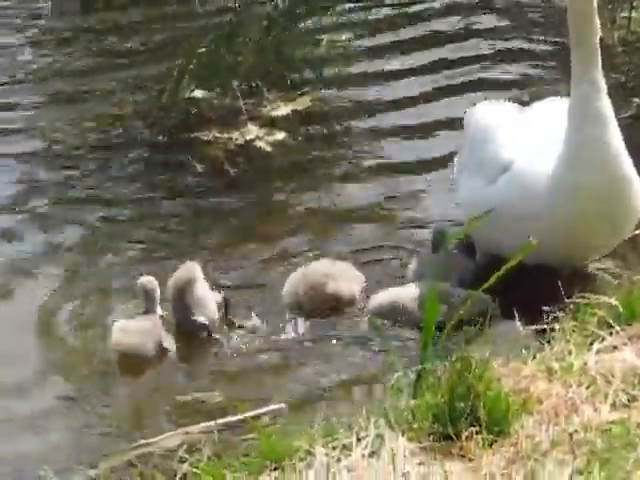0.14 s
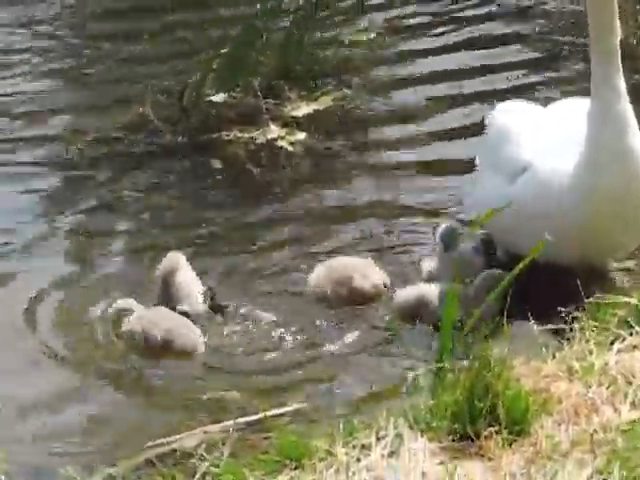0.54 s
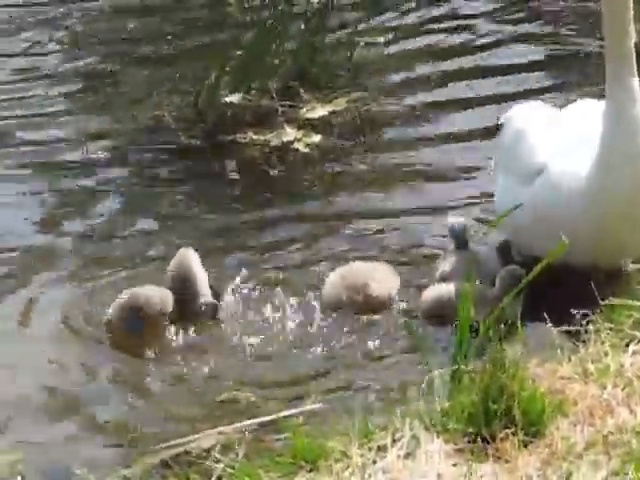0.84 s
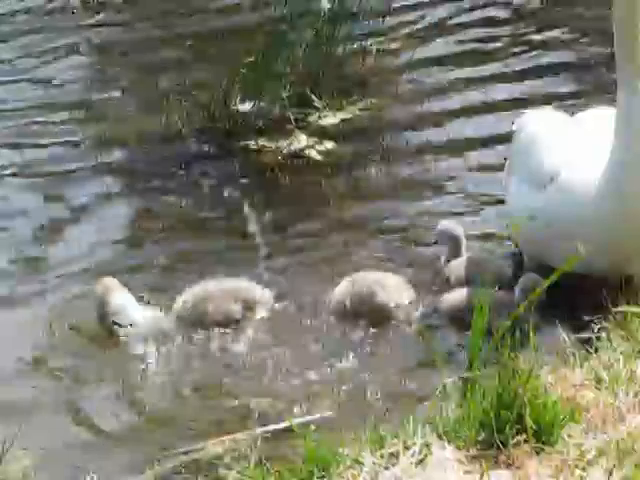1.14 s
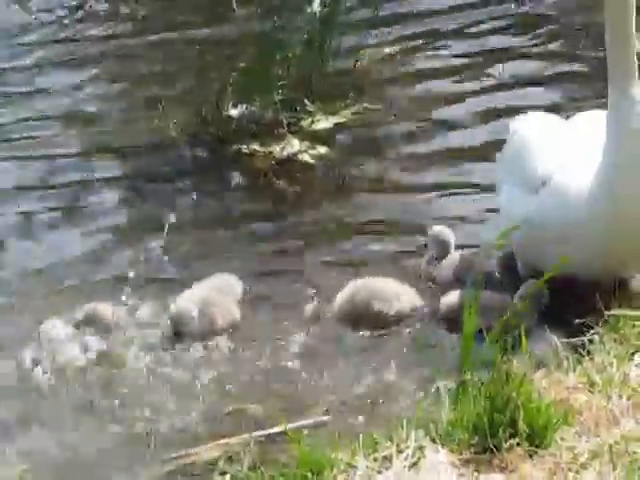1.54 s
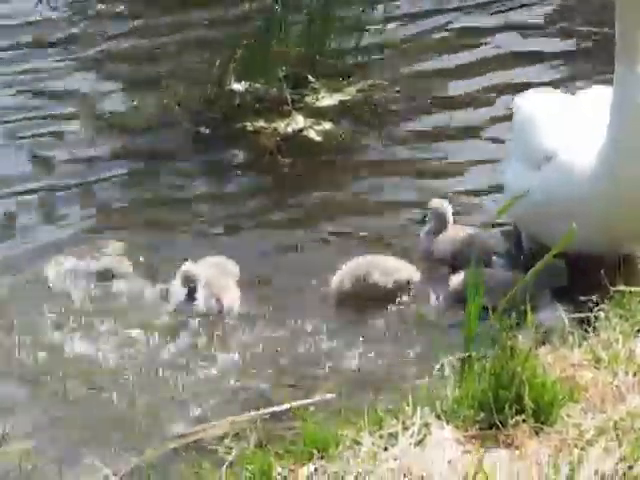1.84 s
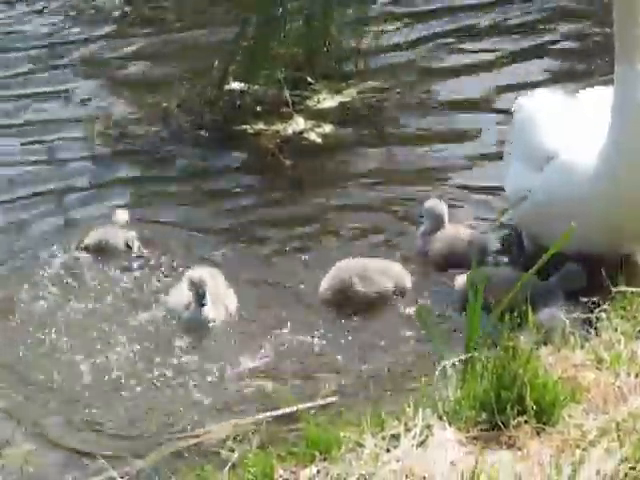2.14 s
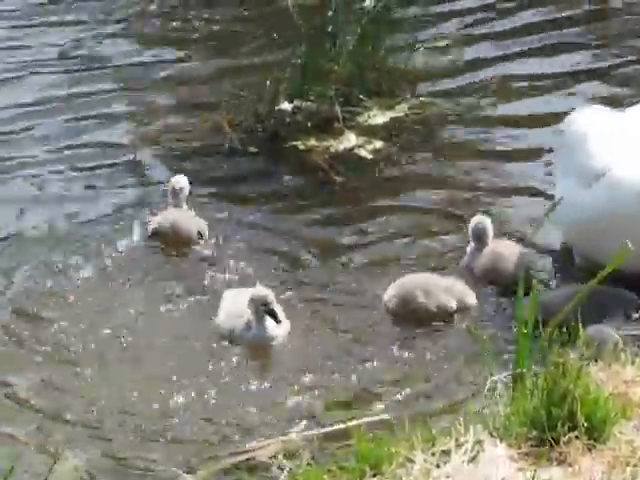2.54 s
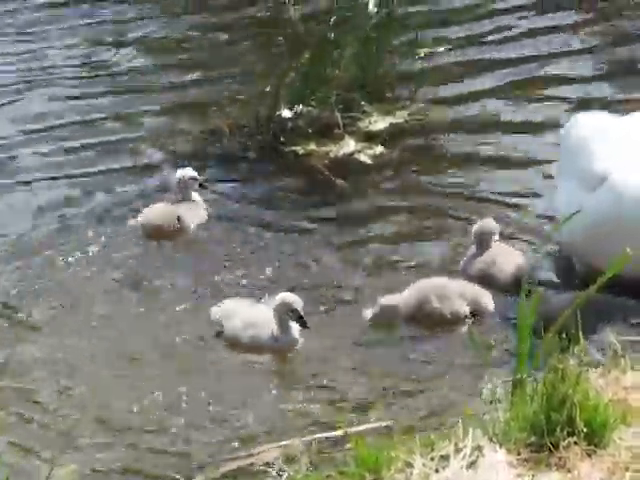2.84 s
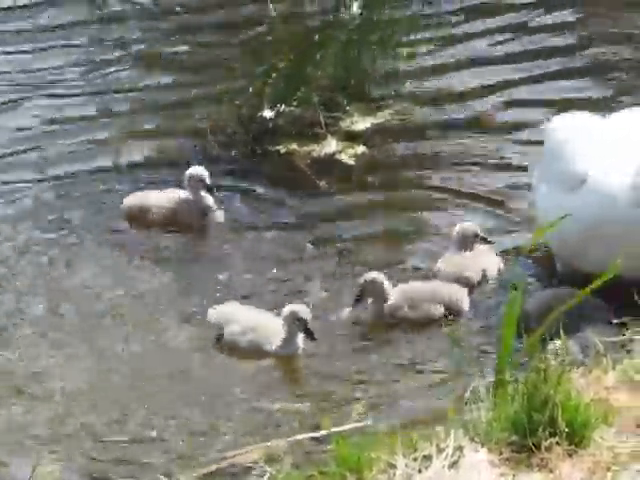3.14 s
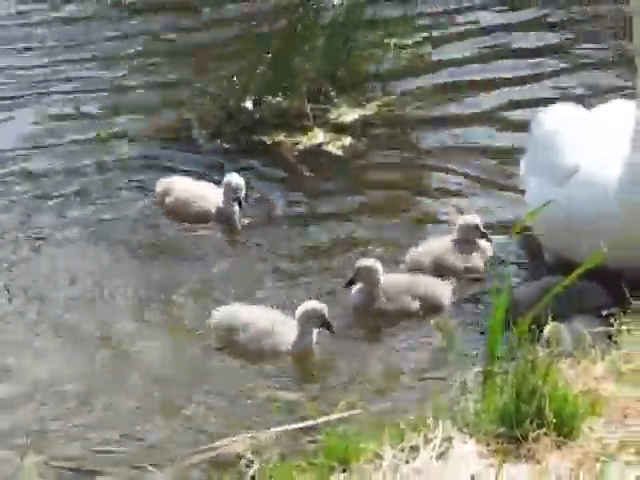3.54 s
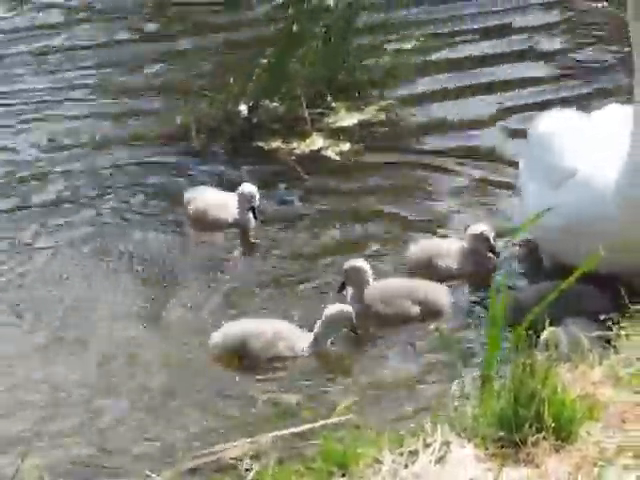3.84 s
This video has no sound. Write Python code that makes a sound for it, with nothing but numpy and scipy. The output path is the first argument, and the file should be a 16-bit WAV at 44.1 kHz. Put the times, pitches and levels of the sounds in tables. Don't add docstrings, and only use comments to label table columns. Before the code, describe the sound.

Lumpy wind rumble and thumps buffet the stereo microphones at a pond, with two short honks at the start, then cygnets splashing close by with plops and spray, fading as the wind grows.

```python
import sys
import numpy as np
from scipy import signal
from scipy.io import wavfile
from scipy.ndimage import uniform_filter1d

SR = 44100
rng = np.random.default_rng(int(sys.argv[2]) if len(sys.argv) > 2 else 0)


def waveform_to_disk(signal):
    frames = np.transpose(np.atleast_2d(signal))
    scaled = np.clip(frames, -1, 1) * 32767
    samples = np.round(scaled).astype(np.int16)
    wavfile.write(sys.argv[1], SR, samples)


def level_to_linear(level):
    exponent = np.asarray(level, float) / 20
    return 10 ** exponent


N = 176400


def read(points, hz):
    f, value = np.transpose(points)
    return np.interp(np.log(hz + 1), np.log(f + 1), value)


def curve(rows, t):
    rows = np.transpose(rows)
    return [np.interp(t, rows[0], column) for column in rows[1:]]


def evened(x):
    return x / np.sqrt(np.mean(x ** 2) + 1e-20)


def add(mix, s, sound):
    part = mix[..., max(round(s * SR), 0):][..., :sound.shape[-1]]
    part += sound[..., :part.shape[-1]]


def panned(x, pan_db):
    gain = level_to_linear(np.array([.5, -.5])[:, None] * pan_db)
    return x * gain / gain.mean(0)


def resonate(x, hz, width):
    turn = np.exp(2j * np.pi * hz * np.arange(len(x)) / SR)
    r = np.exp(-np.pi * width / SR)
    return 2 * (turn * signal.lfilter([1 - r], [1, -r], x / turn)).real


def hiss(field_db, same, size):
    a, b, c, d = rng.standard_normal(field_db.shape[-1:] + (size // 2 + 1, 4)).T
    left = a + 1j * b
    right = same * left + np.sqrt(1 - same ** 2) * (c + 1j * d)
    z = np.array([left, right]) * level_to_linear(field_db)
    return signal.istft(z, nperseg=size, noverlap=size * 3 // 4)[1][:, :N]


def bubble(hz, cycles, rise):
    u = np.arange(0, 3 * cycles, hz / SR)
    swell = (2 * u / cycles * np.exp(1 - 2 * u / cycles)) ** 2
    return swell * np.sin(2 * np.pi * u * (1 + rise * u / cycles))


# (time [s], far road level [dB], open air level [dB])
BACKGROUND = [(0, -44, -50), (1.5, -40, -48), (1.9, -44, -50.5), (2.45, -52.5, -54.5), (2.9, -54.5, -55),
              (4, -56, -58)]
# (frequency [Hz], level [dB per Hz])
ROAD_SPECTRUM = [(150, -29), (400, 2.5), (600, -6), (850, 6.5), (1100, -3), (1500, -11), (2500, -13.5),
                 (4000, -24)]
# (frequency [Hz], level [dB per Hz])
AIR_SPECTRUM = [(900, -8.5), (1450, -9.5), (4000, -12), (7500, -18), (15600, -36)]
# (frequency [Hz], likeness [0-1])
LIKENESS = [(240, 1), (950, 0.82), (3770, 0.08), (15000, .44)]


def ambience():
    size, whine_hz, whine_db = 512, 7882, -69
    hz, t = np.fft.rfftfreq(size, 1 / SR), np.arange(N) / SR
    frames = N * 4 // size + 5
    same = np.clip(read(LIKENESS, hz), 0, 1)[:, None]
    patches = uniform_filter1d(rng.standard_normal((frames, len(hz))), size=24, axis=0)
    patches = evened(uniform_filter1d(patches, size=6, axis=1)).T
    road_db, air_db = curve(BACKGROUND, t)
    road_shape = read(ROAD_SPECTRUM + [(9000, -78)], hz)[:, None]
    air_shape = read([(200, -6)] + AIR_SPECTRUM, hz)[:, None]
    road = evened(hiss(road_shape + 1.2 * patches, same, size))
    air = evened(hiss(air_shape + patches, same, size))
    whine = np.sin(2 * np.pi * np.cumsum(whine_hz + 35 * np.sin(2 * np.pi * 30 * t)) / SR)
    whine = level_to_linear(whine_db + (air_db + 55) / 2) * whine
    return level_to_linear(road_db + 2.5) * road + level_to_linear(air_db + 4.5) * air + whine


# (time [s], left level [dB], right level [dB])
WIND_LEVEL = [(0, -29.5, -20.5), (.7, -29, -25), (1.2, -31, -30.5), (1.6, -35.5, -30.5), (1.75, -34, -20),
              (2.1, -24.5, -16.5), (2.3, -32.5, -17.5), (2.8, -22, -14.5), (3.2, -21, -14.5),
              (3.45, -31.5, -18), (4, -18, -16)]
# (time [s], level [dB])
EDDIES = [
    [(.05, -19.5), (.46, -19), (.6, -19.5), (.85, -16.5), (1.05, -22.5), (1.26, -32), (1.7, -16.5),
     (1.785, -11.5), (1.83, -10), (1.872, -12), (2.033, -17), (2.101, -9), (2.12, -10.5), (2.159, -14.5),
     (2.375, -15.5), (2.458, -11.5), (2.74, -13.5), (2.8, -9), (2.935, -19), (3.095, -15.5), (3.285, -19),
     (3.552, -16), (3.654, -20), (3.951, -23.5)],
    [(.07, -11), (.413, -16), (.473, -10), (.63, -12), (.74, -15.5), (.86, -18.5), (1.07, -31.5),
     (1.63, -24), (1.714, -16), (1.844, -14), (1.906, -14.5), (2.103, -9), (2.165, -9), (2.359, -10),
     (2.405, -8), (2.46, -7), (2.66, -10.5), (2.754, -8), (2.8, -10.5), (2.959, -13), (3.109, -8),
     (3.21, -38), (3.538, -8), (3.582, -11), (3.664, -11), (3.793, -10)],
]
# (frequency [Hz], level [dB per Hz])
RUMBLE_SPECTRUM = [(15, 1.5), (70, 5), (140, 0), (210, -15), (330, -21.5), (800, -43), (1500, -52)]


def wind():
    size, brighten, lump_db, thump_s, steady = 512, .25, 2.5, .013, .6
    t = np.arange(N * 4 // size + 5) * size / 4 / SR
    hz = np.fft.rfftfreq(size, 1 / SR)
    lumps = evened(uniform_filter1d(rng.standard_normal((len(t), 2)), size=10, axis=0).T)
    power = level_to_linear(2 * (np.array(curve(WIND_LEVEL, t)) + lump_db * lumps))
    power = power + [sum(level_to_linear(2 * db) * np.exp(-((t - s) / thump_s) ** 2) for s, db in port)
                     for port in EDDIES]
    port_db = 10 * np.log10(power)
    stretch = level_to_linear(brighten * (port_db + 13.5))[:, None]
    shape = read(RUMBLE_SPECTRUM + [(6000, -120)], hz[:, None] / stretch)
    shape = shape - 10 * np.log10(level_to_linear(2 * shape).sum(1, keepdims=True))
    x = hiss(shape, 0.095, size)
    swing = uniform_filter1d(uniform_filter1d(x ** 2, size=700), size=700)
    swing = np.sqrt(abs(swing) + 1e-12)
    gain = [np.interp(np.arange(N) / SR, t, level_to_linear(db)) for db in port_db]
    push = np.array(gain) * evened(x / swing ** steady)
    return push * (0.97 + 0.48 * push ** 2)


# (time [s], peak level [dB], left-right [dB])
EDDY_EDGES = [(1.736, -37, -2), (1.809, -28, 9), (1.859, -34, -4), (1.981, -36, -2), (2.168, -32, -5),
              (2.312, -38, -3), (2.399, -29, -9), (2.442, -40, -1.0), (2.462, -29, -8.5), (2.75, -32, 4),
              (3.068, -34, -10), (3.112, -27, -11.5), (3.132, -33, -1), (3.434, -37, -4), (3.534, -31, -1),
              (3.682, -30.5, -16), (3.812, -29, -14.5)]
# (time [s], peak level [dB], pitch [Hz], left-right [dB])
FAST_EDDIES = [
    (1.803, -14, 267, 18),
    (1.893, -15.5, 260, -5),
    (2.355, -22, 198, -2),
    (3.62, -23, 295, -7),
]


def cracks():
    crack_db, crack_hz, crack_cycles, whirl_cycles = 7.5, 431, 1.42, 3.4
    out = np.zeros((2, N))
    for (s, db, pan_db), (a, b) in zip(EDDY_EDGES, rng.random((len(EDDY_EDGES), 2))):
        pop = bubble(crack_hz * (0.89 + 0.29 * a), crack_cycles, -0.11)
        pop = pop * np.sign(b - .5)
        add(out, s, panned(level_to_linear(db + crack_db) * pop, 2 * pan_db))
    for s, db, hz, pan_db in FAST_EDDIES:
        add(out, s, panned(level_to_linear(db) * bubble(hz, whirl_cycles, 0), 2 * pan_db))
    return out


def bank(x):
    t60_s, level_db = .04, -12
    t = np.arange(8000) / SR
    scattered = rng.random((8000, 2)).T < .05
    taps = rng.standard_normal((8000, 2)).T * scattered * level_to_linear(-60 * t / t60_s) * (t > .003)
    return level_to_linear(level_db) * signal.fftconvolve(x[None], taps / np.linalg.norm(taps[0]), axes=1)[:, :N]


# (start [s], length [s], top pitch [Hz], level [dB])
CYGNET_PEEPS = [
    (1.95, .07, 2300, -53),
    (2.83, .1, 2500, -53),
    (3.262, .066, 2190, -52.5),
]


def peep(start, length, top_hz, level_db):
    arch, skew = .25, 1.1
    u = np.arange(0, 1, 1 / (length * SR))
    hz = top_hz * (1 - arch + arch * np.sin(.93 * np.pi * u ** skew))
    return start, level_to_linear(level_db) * np.sin(np.pi * u) ** .3 * np.sin(2 * np.pi * np.cumsum(hz) / SR)


# (time [s], pitch [Hz], effort level [dB], roughness [0-1])
HONK_CALLS = [
    [(.195, 505, -48, .1), (.202, 497, -30, .2), (.222, 482, -28, .25), (.242, 452, -30, .4),
     (.254, 400, -31, .7), (.268, 345, -32, .85), (.278, 330, -44, .9)],
    [(.341, 480, -50, .6), (.344, 480, -26, .6), (.349, 470, -48, .7), (.358, 500, -34, .7),
     (.388, 515, -28, .55), (.408, 545, -29, .42), (.434, 568, -28.5, .4), (.45, 575, -33, .25),
     (.472, 578, -42, .2)],
]
# (frequency [Hz], width [Hz], level [dB], left-right [dB])
THROAT_RESONANCES = [(596, 145, 0, -3.5), (1020, 380, 0, 6.5), (1650, 250, -5, -19), (2005, 275, 1.5, -19),
                     (2490, 160, -7, 5), (3970, 900, -10.5, -7)]


def honk(rows):
    flutter_hz, flutter = 95, .5
    t = np.arange(rows[0][0], rows[-1][0], 1 / SR)
    hz, effort_db, rough = curve(rows, t)
    rough = np.clip(rough, 0, 1)
    wobble = evened(uniform_filter1d(rng.standard_normal(len(t)), size=150))
    turns = np.cumsum(hz * (1 + 0.073 * rough * wobble)) / SR
    folds = sum(np.cos(2 * np.pi * k * turns) for k in range(1, 7))
    folds = folds * (1 + 2 * flutter * rough * np.sin(2 * np.pi * flutter_hz * t + 1.7 * wobble))
    puffs = (0.11 + np.exp(-(turns % 1) / 0.18)) * rng.standard_normal(len(t))
    drive = (1 - rough) * evened(folds) + rough * evened(puffs)
    throat = 0
    for f, width, db, pan_db in THROAT_RESONANCES:
        ring = resonate(resonate(drive, f, width), f, width)
        throat = throat + panned(level_to_linear(db) * ring, pan_db)
    return t[0], level_to_linear(effort_db) * evened(throat)


# (time [s], spray level [dB])
PADDLING = [
    (.6, -63.5),
    (1.0, -51.5),
    (1.3, -50),
    (1.55, -43.5),
    (1.85, -49.5),
    (2.15, -65),
    (2.5, -64.5),
]


def spray():
    drops_per_s, spread_db, low_hz, high_hz, tilt_db, rise = 2200, 3.6, 1500, 14000, -6.5, .055
    effort_db, = curve(PADDLING, np.arange(N) / SR)
    drop = rng.random(N) < drops_per_s / SR
    size = level_to_linear(spread_db * np.minimum(rng.exponential(1, N), 4)) * drop
    size = size + .3 * rng.standard_normal(N)
    kind, out = rng.integers(0, 32, N), np.zeros((2, N))
    for k, (a, b) in enumerate(rng.random((32, 2))):
        hz = low_hz * (high_hz / low_hz) ** (k / 32 + a / 32)
        grain = level_to_linear(tilt_db * np.log2(hz / 2000)) * bubble(hz, 0.42 + 4 * b, rise)
        out[k % 2] += signal.oaconvolve(size * (kind == k), grain)[:N]
    clumps = evened(uniform_filter1d(rng.standard_normal(N), size=900))
    return level_to_linear(effort_db + 4.6 * clumps) * evened(out + 0.29 * out[::-1])


# (time [s], peak level [dB], pitch [Hz])
BUBBLE_PLOPS = [(0.6853, -39, 2390), (0.719, -42, 2380), (0.8621, -32.5, 3240), (0.9192, -35.5, 3760),
                (1.049, -36, 2650), (1.1176, -32, 2420), (1.1208, -24.5, 1950), (.7904, -47, 2860),
                (1.041, -45, 1890), (1.0907, -45, 2870), (1.1508, -45, 2900), (1.143, -45, 1650),
                (1.396, -45, 3420), (1.241, -41.5, 4700), (1.689, -41, 2300), (1.848, -40, 2900),
                (1.629, -45, 2780), (1.651, -44, 2070), (1.748, -48, 1930), (1.784, -42, 3000),
                (1.84, -42, 1940), (1.976, -46, 2150), (2.064, -45.5, 1980), (1.2054, -40.5, 3750),
                (1.251, -38, 2600), (1.2913, -39, 1670), (1.3124, -37.5, 2370), (1.3362, -36.5, 2500),
                (1.3803, -38, 4830), (1.4224, -49, 1620), (1.516, -47, 1630), (1.5452, -33.5, 2880),
                (1.672, -33.5, 2570), (1.6838, -40, 1860), (1.862, -40, 1740), (1.8857, -36.5, 3170),
                (1.944, -44, 2690), (2.1134, -40.5, 2520)]
# (time [s], peak level [dB], centre [Hz])
WATER_SLAPS = [(.244, -34.5, 6700), (.721, -42, 7960), (.745, -40, 10500), (0.858, -31.5, 6200),
               (.923, -27, 6000), (0.927, -44, 8950), (1.11, -47, 10000), (1.201, -36, 6600),
               (1.347, -36, 6760), (1.417, -39.5, 12600), (1.479, -41, 10000), (1.506, -46, 11000),
               (1.528, -32, 4940), (1.572, -38.5, 7900), (1.8, -45, 12500), (1.853, -39.5, 9100),
               (1.677, -30.5, 3460), (2.298, -48, 10500), (2.394, -45, 9000), (2.751, -47, 8100)]
# (time [s], peak level [dB], centre [Hz])
DROP_TICKS = [(1.226, -39, 11000), (1.232, -40, 10500), (1.252, -31, 3800), (1.41, -37.5, 3300),
              (1.673, -31, 4000), (1.358, -36, 6000), (1.371, -46, 13000), (1.446, -36, 6500),
              (1.486, -37, 10500), (1.499, -36, 9500), (1.523, -24, 5000), (1.532, -33, 9000),
              (1.543, -29.5, 5960), (1.747, -37.5, 10000), (1.772, -38.5, 10500), (1.783, -39.5, 12000),
              (1.790, -39, 10900), (1.840, -38.5, 13000), (1.886, -44, 12500), (1.915, -44, 11600),
              (1.928, -42.5, 11000), (2.081, -44, 11000), (2.091, -41, 12000), (1.203, -32.5, 10000),
              (2.113, -37, 4200)]


def splashes():
    rise, plop_cycles, slap_s, slap_width, tick_db = .055, 4.5, .00075, .53, -5
    out = np.zeros(N)
    for (s, db, hz), spread in zip(BUBBLE_PLOPS, rng.uniform(.75, 1.25, len(BUBBLE_PLOPS))):
        add(out, s, level_to_linear(db + 9) * bubble(hz, plop_cycles * spread, rise))
        second = bubble(hz * np.sqrt(spread), plop_cycles / 2, rise)
        add(out, s + 0.0045 * spread, level_to_linear(db + 3.5) * second)
    t = np.arange(0, 6 * slap_s, 1 / SR)
    swell = (t / slap_s / 2 * np.exp(1 - t / slap_s / 2)) ** 4
    slaps = WATER_SLAPS + [(s, db + tick_db, hz) for s, db, hz in DROP_TICKS]
    for (s, db, hz), puff in zip(slaps, rng.standard_normal((len(slaps), 800))):
        width = slap_width * hz
        ring = evened(resonate(resonate(puff, hz, width), hz, width))[:len(t)]
        add(out, s, level_to_linear(db - 3) * ring * swell)
    return out


def scene():
    water_pan_db = -5.5
    bird, chick, water = np.zeros((2, N)), np.zeros(N), splashes()
    for rows in HONK_CALLS:
        add(bird, *honk(rows))
    for row in CYGNET_PEEPS:
        add(chick, *peep(*row))
    near = bird + panned(water + chick, water_pan_db)
    echoes = bank(bird.mean(0) + water + chick)
    return near + echoes + spray() + ambience() + wind() + cracks()


def low_pass(x):
    return signal.sosfilt(signal.butter(12, 15700, fs=SR, output="sos"), x)


def record(dry):
    ceiling = 1.1
    mix = np.clip(ceiling * np.tanh(dry / ceiling), -1, 1)
    return low_pass(mix)


dry = scene()
out = record(dry)
waveform_to_disk(out)
```